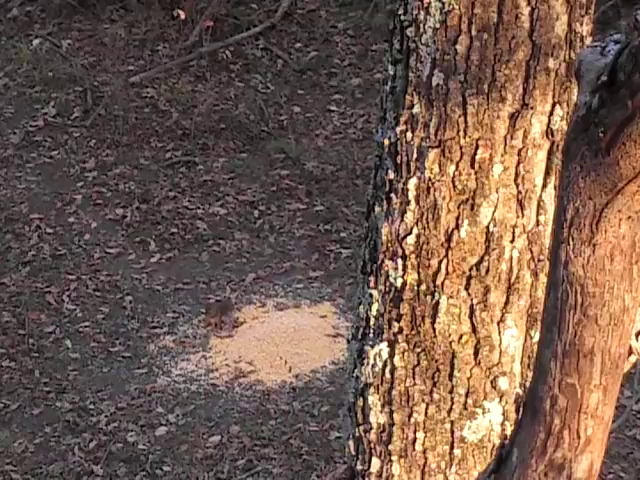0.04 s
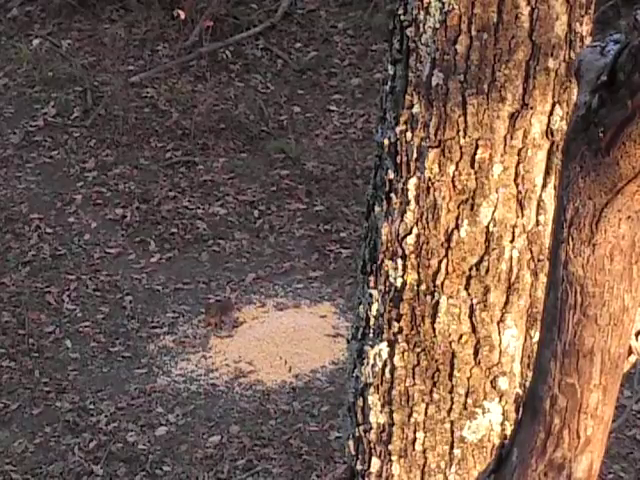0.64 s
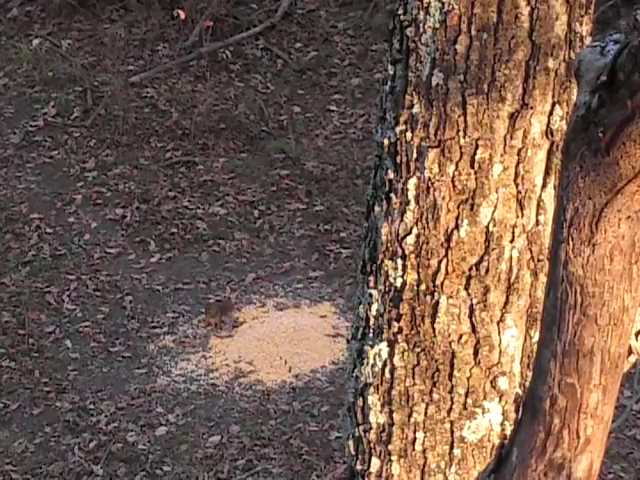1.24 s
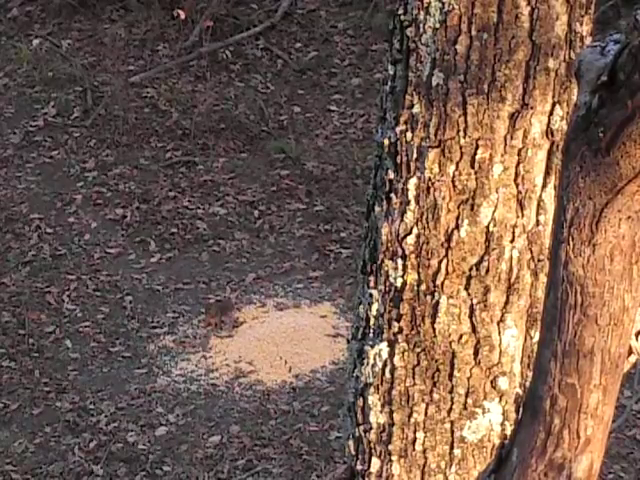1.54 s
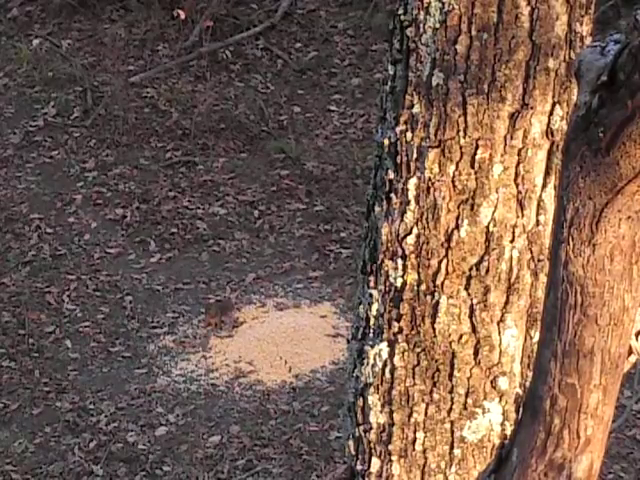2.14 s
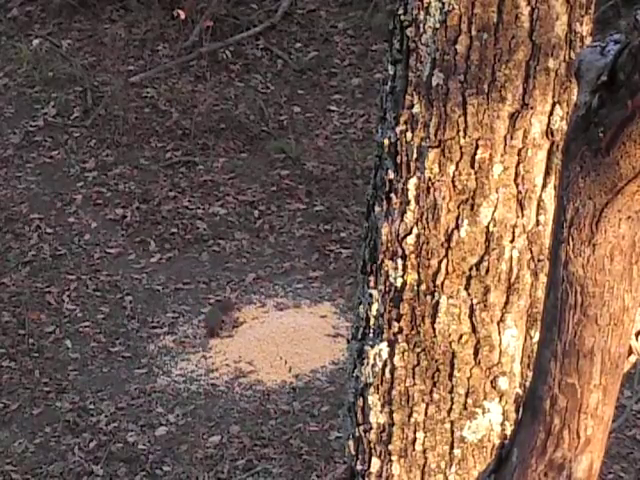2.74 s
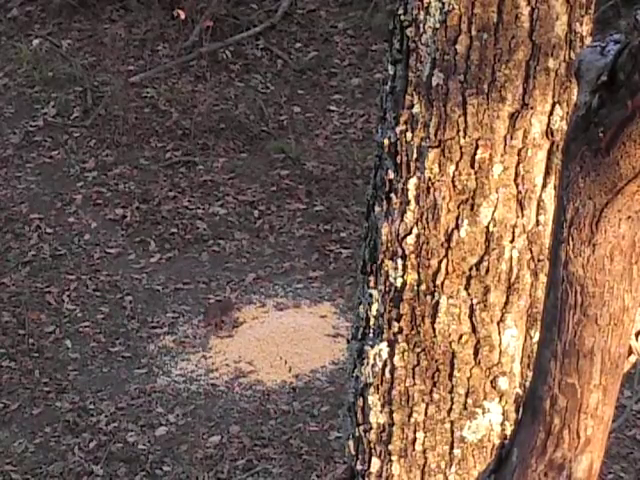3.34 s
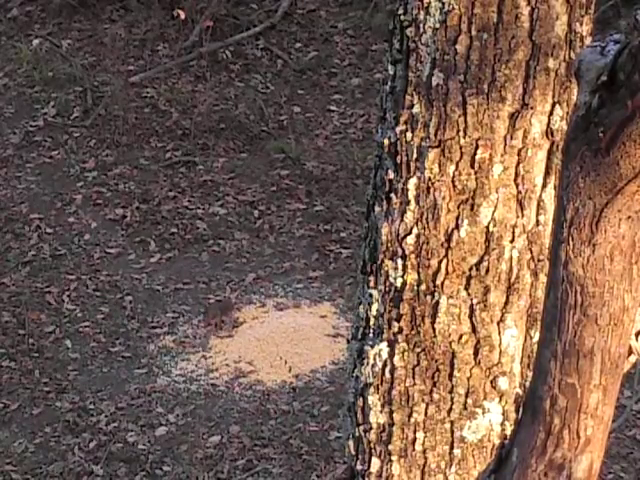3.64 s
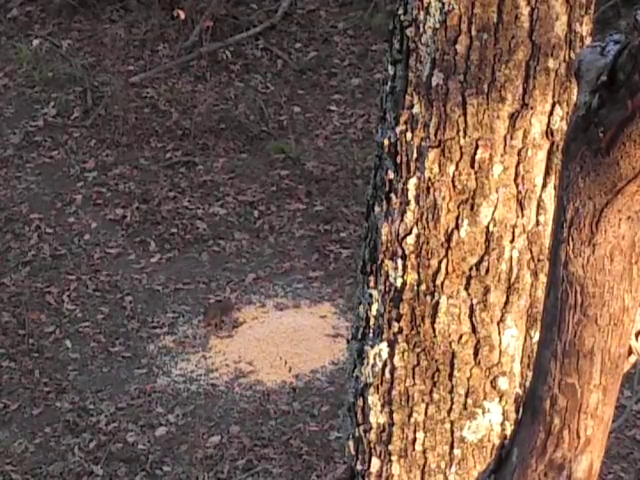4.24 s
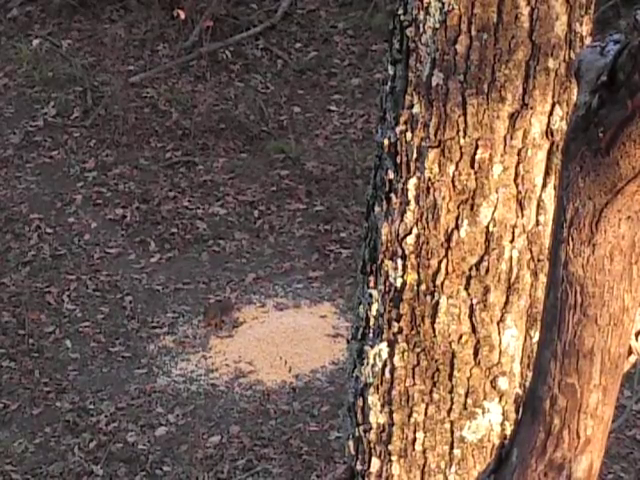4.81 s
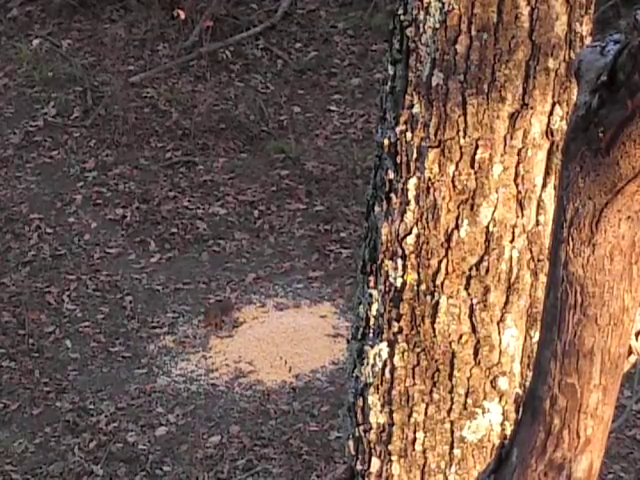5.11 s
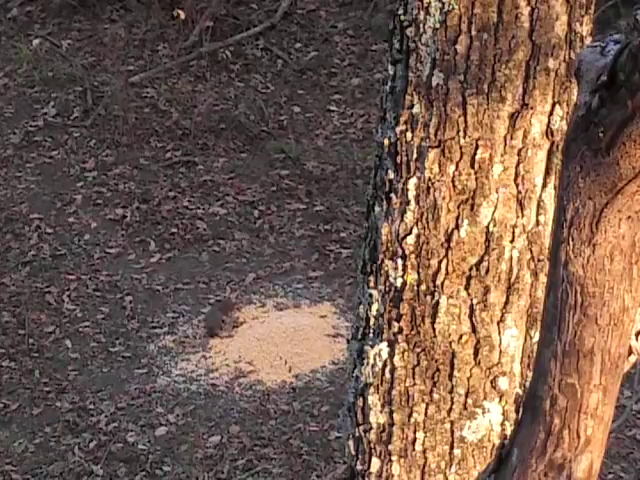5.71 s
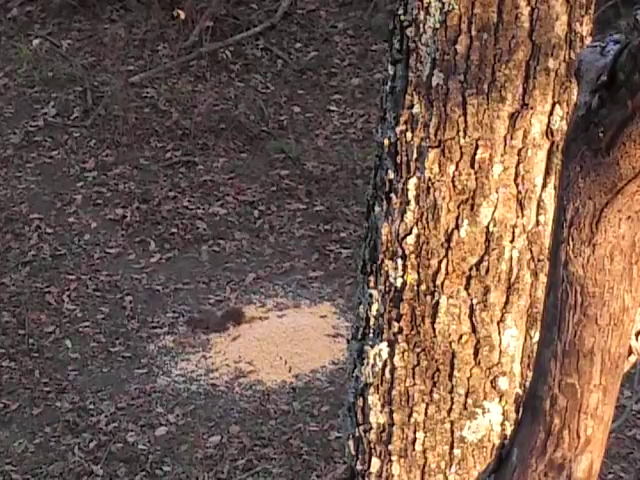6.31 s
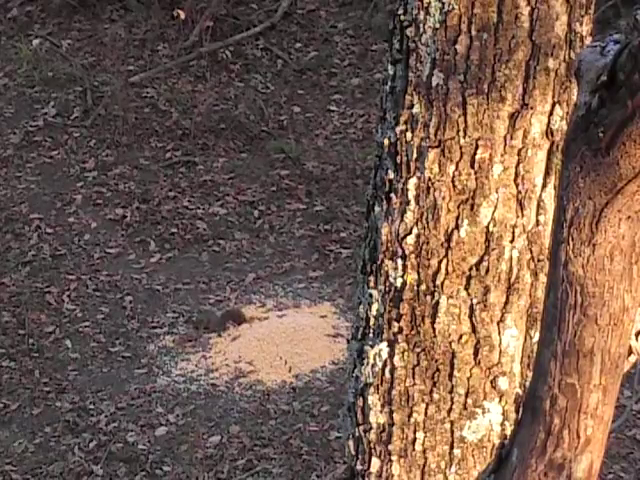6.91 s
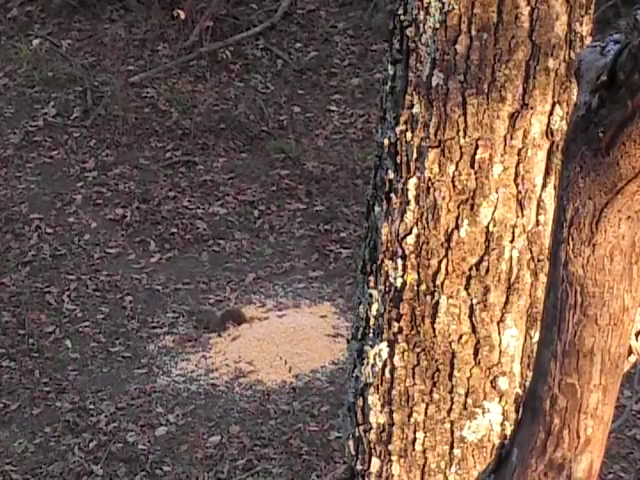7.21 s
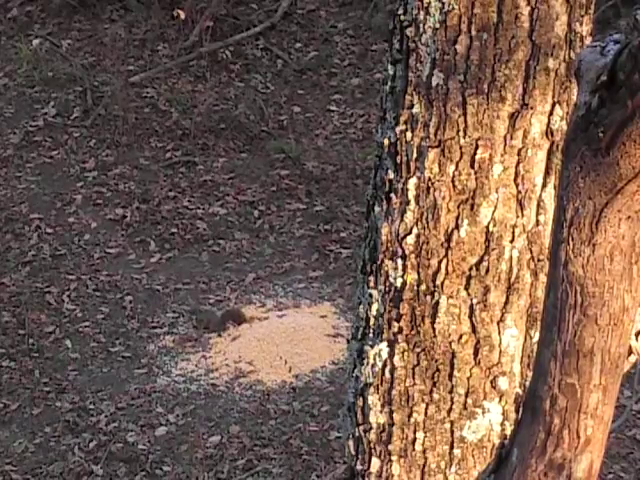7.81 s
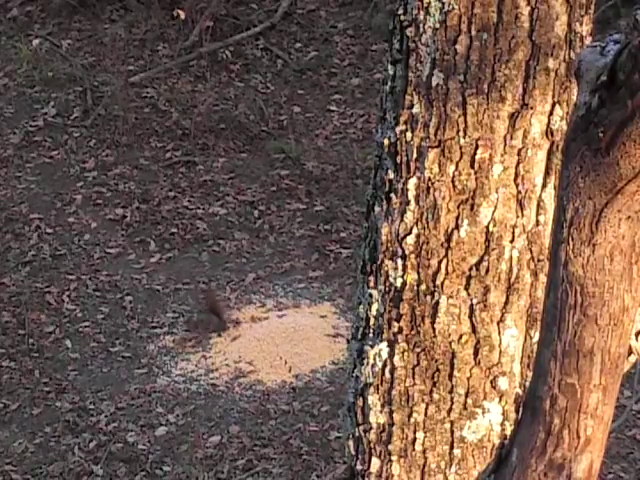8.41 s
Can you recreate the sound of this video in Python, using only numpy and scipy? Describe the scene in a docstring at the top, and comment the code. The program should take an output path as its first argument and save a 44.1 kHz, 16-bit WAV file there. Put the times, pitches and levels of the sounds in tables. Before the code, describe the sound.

Crickets trill in a wood as a bow fires with a sharp snap and twang, and the arrow cracks into the ground just after.

```python
"""Bow shot among crickets.

A bow is shot from a tree stand in a wood full of trilling crickets. The release clicks, the
string slams home and twangs, the fittings rattle; a quarter second later the arrow thuds into
the ground. The trees throw both sounds back, the nearest cricket falls silent, and gear and
dry leaves tick faintly."""
import sys
import numpy as np
from scipy import signal
from scipy.fft import rfft, irfft
from scipy.io import wavfile
from scipy.ndimage import uniform_filter1d

SR = 44100
rng = np.random.default_rng(int(sys.argv[2]) if len(sys.argv) > 2 else 0)


def output_pcm(signal):
    """Save a mono or channel-first signal as 16-bit PCM at the path in sys.argv[1].

    Samples are clipped to [-1, 1] before scaling.
    """
    pcm = np.clip(np.atleast_2d(signal).T, -1, 1) * 32767
    wavfile.write(sys.argv[1], SR, np.round(pcm).astype(np.int16))


N = 377055
TIME = np.arange(N) / SR
AGE = TIME[:SR // 2]  # time since an onset [s]


def amp(db):
    """Decibels to gain."""
    return 10 ** (np.asarray(db) / 20)


def unit(x):
    """Scales to rms 1."""
    return x / np.sqrt(np.mean(x ** 2) + 1e-20)


def read(points, hz):
    """Reads a table on a log-frequency axis."""
    f, value = np.transpose(points)
    return np.interp(np.log(hz + 1), np.log(f + 1), value)


def decay(t, t60_s):
    """Exponential decay, 60 dB down at t60_s."""
    return np.exp(-np.log(1000) * t / t60_s)


def add(mix, start_s, sound):
    """Adds a sound to the mix in place."""
    part = mix[:, round(start_s * SR):][:, :sound.shape[-1]]
    part += sound[..., :part.shape[1]]


def noise(shape_db, likeness, size):
    """Stereo noise with spectrum shape_db(hz) and a table of left-right likeness."""
    hz = np.fft.rfftfreq(size, 1 / SR)
    mid, side = rfft(rng.standard_normal((2, size)))
    same = np.clip(read(likeness, hz), -1, 1)
    pair = mid * np.sqrt(1 + same) + np.array([[1], [-1]]) * side * np.sqrt(1 - same)
    return unit(irfft(pair * amp(shape_db(hz)), size))


# near sounds at the two microphone ports: (frequency [Hz], likeness [0-1])
PORT_LIKENESS = [(100, 0.99), (1500, 0.98), (3000, 1), (6000, .75), (10000, 0.5), (14000, 0.21)]

def near_noise(spectrum, size):
    """Noise from close by: alike at both ports except in the treble."""
    return noise(lambda hz: read(spectrum, hz), PORT_LIKENESS, size)


def snaps(rows):
    """Noise bursts with one broad resonance each; the briefest rise most sharply."""
    out = np.zeros((2, N))
    for start_s, db, pitch_hz, octaves, t60_s in rows:
        def band_db(hz):
            offset = np.log2((hz + 1) / pitch_hz) / octaves
            return -10 * np.log10(1 + 3 * offset ** 4) - 10 * np.log10(1 + (hz / 13000) ** 20)
        burst = noise(band_db, PORT_LIKENESS, len(AGE))
        envelope = decay(AGE, t60_s) * (1 - np.exp(-AGE / (0.014 * t60_s)))
        add(out, start_s, amp(db) * unit(burst * envelope) * np.sqrt(np.mean(envelope ** 2)))
    return out


# still air: (frequency [Hz], relative density [dB])
AIR_SPECTRUM = [(20, -8.5), (60, -8), (100, -4.5), (130, 2.5), (220, -4.5), (400, -6.5), (900, -9.5),
                (1500, -15), (3500, -17), (7600, -19), (10100, -9), (12000, -19.5), (14000, -22),
                (15700, -28)]
# its left-right match: (frequency [Hz], likeness [0-1])
AIR_LIKENESS = [(30, 0.5), (140, 0.69), (500, 0.22), (1500, 0.17), (4000, 0.65), (9000, 0.24),
                (14000, 0.0926)]

def air():
    """Distant rumble under fine hiss, with one faint far-off whine."""
    waver = unit(uniform_filter1d(rng.standard_normal(N), size=SR // 8))
    whine = np.sin(2 * np.pi * np.cumsum(838 + 4 * waver) / SR)
    return amp(-56.5) * noise(lambda hz: read(AIR_SPECTRUM, hz), AIR_LIKENESS, N) + amp(-73) * whine


def beat(first_s, per_s):
    """Running count of wing strokes at a steady or changing pace."""
    count = np.cumsum(per_s * np.ones(N)) / SR
    return count - np.interp(first_s, TIME, count) + 1


def trill(strokes, pitch_hz, slide_hz, arch_hz, duty, overtone_db):
    """Each wing stroke scrapes out one tone pulse whose pitch follows wing speed."""
    number = np.round(strokes).astype(int)
    place = np.clip((strokes - number) * 2 / duty, -1, 1)  # -1 to 1 through the pulse
    detune, force = rng.standard_normal((number.max() + 1, 2))[number].T
    hz = pitch_hz * (1 + .003 * detune) + slide_hz * place - arch_hz * place ** 2
    phase = 2 * np.pi * np.cumsum(hz) / SR
    pulse = np.cos(np.pi / 2 * place) * amp(0.61 * force)
    return unit(pulse * (np.sin(phase) + amp(overtone_db) * np.sin(2 * phase)))


def undergrowth(song, wet_db, t60_s):
    """Leaves and trunks scatter a song; its level is kept."""
    scatter = noise(np.zeros_like, [(4000, 0.62), (7000, 0.81)], len(AGE)) * decay(AGE, t60_s)
    wet = signal.oaconvolve(song[None], scatter, axes=1)[:, :N]
    return np.std(song) * unit(unit(song) + amp(wet_db) * unit(wet))


# colour of the far crickets: (frequency [Hz], gain [dB])
CHORUS_EQ = [(3900, -25.5), (4300, -3.5), (4600, -2), (5050, 1.4), (5500, -0.9), (6100, -4.5), (6450, 2.5),
             (6750, -13.5)]

def chorus():
    """Far crickets blur together, each at its own pace and wandering pitch."""
    songs = np.zeros(N)
    for hz in np.linspace(4550, 6350, num=22):
        strokes = TIME * rng.uniform(30, 62) + rng.random()
        wander = np.interp(TIME, np.linspace(0, TIME[-1], num=40), rng.standard_normal(40))
        songs += trill(strokes, hz + 80 * wander, slide_hz=-260, arch_hz=110.8,
                       duty=.64, overtone_db=-10.5)
    scattered = undergrowth(songs, wet_db=-0.5, t60_s=.34)
    colour = amp(read(CHORUS_EQ, np.fft.rfftfreq(N, 1 / SR)))
    return amp(-47) * unit(irfft(rfft(scattered) * colour, N))


# the cricket with the sliding note flags once and recovers: (time [s], pace [strokes/s])
SLIDING_PACE = [(0, 57.7), (2.3, 58.1), (4.35, 57.7), (5.15, 53.8), (5.85, 58.75), (8.55, 57.4)]

def crickets(startled_s=6.12):
    """Four singers stand out from the chorus; the shot startles the nearest into silence."""
    hush = decay(np.maximum(TIME - startled_s, 0), t60_s=.04)
    pace = np.interp(TIME, *np.transpose(SLIDING_PACE))
    near = trill(beat(first_s=.025, per_s=18.883), pitch_hz=6580, slide_hz=-22, arch_hz=454,
                 duty=.46, overtone_db=-37)
    sliding = trill(beat(first_s=.0085, per_s=pace), pitch_hz=4622, slide_hz=-500, arch_hz=283,
                    duty=.83, overtone_db=-27)
    slow = trill(beat(first_s=.04, per_s=16.648), pitch_hz=6030, slide_hz=30, arch_hz=517,
                 duty=.38, overtone_db=-33)
    quick = trill(beat(first_s=.041, per_s=19.81), pitch_hz=6490, slide_hz=0, arch_hz=388,
                  duty=.5, overtone_db=-35.5)
    out = undergrowth(amp(-48) * near * hush, wet_db=-7.5, t60_s=.38)
    out += undergrowth(amp(-52) * sliding, wet_db=-30.5, t60_s=.18)
    out += undergrowth(amp(-56.5) * slow, wet_db=-5, t60_s=.15)
    out += undergrowth(amp(-61.2) * quick, wet_db=-12, t60_s=.15)
    return (out + chorus()) * amp([[-1.4], [1.2]])  # louder on the right


# soft movements: (centre [s], level [dB], half length [s])
RUSTLES = [(.15, -60.5, 0.47), (.72, -58, .11), (1.548, -61.5, 0.458), (6.8, -59.5, 0.61), (7.9, -76, 0.4)]
# their colour: (frequency [Hz], relative density [dB])
RUSTLE_SPECTRUM = [(100, -12), (400, -1.5), (750, -1), (1300, -6.5), (3000, -8.5), (8000, -12),
                   (14000, -33)]

def rustle():
    """Clothing and leaves move, swelling and fading."""
    motion = sum(amp(db) / (1 + ((TIME - s) / half_s) ** 4) for s, db, half_s in RUSTLES)
    return motion * near_noise(RUSTLE_SPECTRUM, N)


# patches of crackle: (start [s], length [s], level [dB])
LEAF_PATCHES = [(0.544, .3, -62), (6.241, .2, -55.5), (6.44, .08, -50), (6.551, .5, -64), (8.219, .08, -54),
                (8.358, 0.13, -60.5)]

def leaf_crackle(clicks_per_s=600):
    """Dry leaves give patches of tiny random snaps."""
    out = np.zeros((2, N))
    spectrum_hz_db = [(300, -10), (2000, -1.5), (7000, 2), (10500, 4), (15000, -18)]
    for start_s, length_s, db in LEAF_PATCHES:
        size = round(length_s * SR)
        chance, force = rng.random((2, size))
        swell = np.sin(np.pi * np.arange(size) / size)
        clicks = (chance < clicks_per_s / SR) * amp(13 * force) * swell
        leaf = near_noise(spectrum_hz_db, 512) * decay(AGE[:512], t60_s=.0073)
        add(out, start_s, amp(db) * unit(signal.fftconvolve(clicks[None], leaf, axes=1)))
    return out


# dull taps of gear on the stand: (time [s], level [dB], pitch [Hz])
GEAR_TAPS = [(.141, -42, 830), (.186, -44, 840), (1.343, -49, 480), (1.578, -46, 1040), (1.632, -46.5, 630),
             (2.75, -47.5, 250), (5.27, -48.5, 250)]
# gear, twigs and leaves: (time [s], level [dB], pitch [Hz], width [oct], t60 [s])
SHARP_TICKS = [(.671, -36.5, 2800, 1.8, .06), (.925, -43.5, 1750, 0.83, 0.077),
               (.99, -46.5, 2800, 1.3, 0.076), (1.395, -41, 1100, 1.2, .016), (6.469, -41, 4200, 2.1, .04),
               (6.4965, -34.5, 3460, .15, 0.019), (6.546, -39.5, 3300, .35, .015),
               (6.751, -37, 9600, .41, .015), (6.782, -45, 5050, 1.3, .03),
               (6.908, -36.5, 10000, .45, .016), (6.954, -38, 11000, .5, .0082),
               (7.241, -42.5, 4100, 1.2, 0.056), (7.599, -48, 3926, .98, .038)]

def taps_and_ticks(faint_per_s=5.5):
    """Small contacts close by, and fainter random ticks through the wood."""
    taps = [(s, db, hz, .25, .055) for s, db, hz in GEAR_TAPS]
    jitter, force = rng.random((60, 2)).T
    times_s = (np.arange(len(jitter)) + jitter) / faint_per_s
    levels_db = -59.5 + 2.5 * (2 * force - 1)
    faint = [(s, db, 2800, .75, .07) for s, db in zip(times_s, levels_db)]
    return snaps(taps + SHARP_TICKS + faint)


# colour of the tree echo: (frequency [Hz], gain [dB])
ECHO_EQ = [(80, -19.5), (220, -12), (380, 5), (560, -4), (850, 5.5), (1200, -3.5), (1800, -0.5), (4000, -4),
           (8000, 3), (12000, 4.5), (15000, 2)]
# its decay: (frequency [Hz], t60 [s])
ECHO_T60 = [(100, 0.79), (400, 1.18), (900, 0.92), (2500, 1.54), (6000, 0.89), (12000, 1.2)]

def tree_echo(sound, wet_db):
    """Many weak reflections from trunks and leaves merge into a tail."""
    t = TIME[:2 * SR]
    build_up = 1 - np.exp(-(t / 0.011) ** 2)
    reflections = noise(np.zeros_like, [(200, .9), (1000, 1), (5000, .3)], len(t)) * build_up
    hz, age, bands = signal.stft(reflections, SR, nperseg=512)
    bands = bands * amp(read(ECHO_EQ, hz))[:, None] * decay(age, read(ECHO_T60, hz)[:, None])
    tail = signal.istft(bands, SR, nperseg=512)[1] / np.sqrt(SR)
    return amp(wet_db) * signal.fftconvolve(sound, tail, axes=1)[:, :N]


# arrow through dry leaves: (time [s], level [dB], pitch [Hz], width [oct], t60 [s])
ARROW_CRACKS = [(6.0149, -15.5, 7750, 0.29, .008), (6.0168, -16, 3400, 2, 0.011),
                (6.0205, -26, 4500, 2, 0.015), (6.024, -34, 7800, 1.6, 0.16),
                (6.037, -31.5, 550, 1.1, 0.077)]
# struck soil: (frequency [Hz], relative level [dB], t60 [s])
GROUND_MODES = [(356, -10, 0.016), (554, 8.5, 0.0091), (775, -8.5, 0.017), (1123, -1.5, 0.016)]

def arrow():
    """The point cracks through leaves and stops in the soil with a dead, hollow thud."""
    out = snaps(ARROW_CRACKS)
    modes = sum(amp(db) * decay(AGE, t60) * np.sin(2 * np.pi * hz * AGE) for hz, db, t60 in GROUND_MODES)
    bass_cut = signal.butter(5, 228, "high", fs=SR)  # too little ground moves to radiate bass
    thud = signal.lfilter(*bass_cut, modes * (1 - np.exp(-AGE / 0.0012)))
    add(out, 6.0159, -amp(-4.5) * thud)
    return out


def launch():
    """The shaft hisses over its rest while the string sweeps the air."""
    hiss = (5.7565, -20.5, 5001, 2.0, 0.22)
    sweep = (5.751, -34.0, 601, 0.5, 0.05)
    return snaps([hiss, sweep])


def rebounds(start_s=5.7835, gap_s=.00605, first_db=-8, loss_db=3):
    """The limbs rebound evenly; each weaker knock comes from another part of the bow."""
    pitches_hz = 3010 * 2 ** (0.298 * rng.standard_normal(7))
    return snaps([(start_s + k * gap_s, first_db - k * loss_db, hz, 1.4, .017)
                  for k, hz in enumerate(pitches_hz)])


# riser, limbs and fittings: (frequency [Hz], relative level [dB], t60 [s])
FRAME_MODES = [(612, 1, .2), (770, -2, .14), (1469, -9, .2), (1558, -7, .19), (1760, -10, .2),
               (1835, -6, .18), (1905, -6, .18), (2057, -7, .16), (2139, -1, .17), (2290, -3, .18),
               (2402, -8, .18), (2695, -5, .13), (3015, 0, .16), (3303, -6, .16), (3555, -7, .16),
               (3914, -5, .16), (4326, 0, .14), (4441, -7, .2), (5377, -6, .2), (6283, -7, .2),
               (7581, -9, .2), (7811, -9, .2), (8110, -4, .18), (8371, -5, .13)]

def frame_ring(damping):
    """The jolted frame rings in its modes."""
    ring = sum(amp(db) * decay(AGE, t60) * np.sin(2 * np.pi * (hz * AGE + rng.random()))
               for hz, db, t60 in FRAME_MODES)
    return amp(-19.5) * ring * damping * (1 - np.exp(-AGE / 0.0019))


# loose fittings: (frequency [Hz], relative density [dB])
BUZZ_SPECTRUM = [(100, -34), (300, 3), (650, 1.5), (1000, -4), (1800, -3), (3500, -10.5), (5500, -6),
                 (7000, -10), (8200, -3.5), (10000, -10.5), (12500, -21), (14500, -48)]

def fittings_buzz(cycles):
    """The fittings rattle at both ends of each string swing, then shiver faintly."""
    slaps = 1 + .5 * np.cos(4 * np.pi * cycles)
    rattle = amp(-15.5) * near_noise(BUZZ_SPECTRUM, len(AGE)) * slaps * decay(AGE, t60_s=.25)
    shiver = amp(-38) * near_noise(BUZZ_SPECTRUM, len(AGE)) * decay(AGE, t60_s=.82)
    return rattle + shiver


# bowstring: (harmonic number, relative level [dB], t60 [s])
STRING_PARTIALS = [(1, -7, 0.49), (2, 1.5, 0.33), (3, 6, 0.16), (4, -1.5, 0.56), (5, -11, 0.25),
                   (6, -18, 0.19), (7, -10, 0.14)]

def string_twang(cycles, damping):
    """The string's harmonics glide together; the cable hums on a little longer."""
    twang = sum(amp(db) * decay(AGE, t60) * np.sin(2 * np.pi * (round(k) * cycles + rng.random()))
                for k, db, t60 in STRING_PARTIALS)
    cable = amp(-10) * np.sin(2 * np.pi * 303 * AGE) * decay(AGE, t60_s=.55) / (1 + (AGE / 0.18) ** 10)
    return amp(-21) * (twang * damping + cable) * (1 - np.exp(-AGE / 0.014))


# release clicks, then string and limb slam: (time [s], level [dB], pitch [Hz], width [oct], t60 [s])
BOW_KNOCKS = [(5.739, -37.5, 10460, .5, .017), (5.7496, -19.5, 5780, 1, .013),
              (5.7547, -8.5, 4800, 0.93, .011), (5.7653, -7, 9000, 1.2, .009), (5.7656, -9, 2300, 1.2, .03),
              (5.7715, -4, 4400, 0.33, .018), (5.7738, -6, 1300, 1.55, 0.017)]
# the slack string tightens as the limbs settle: (time [s], pitch [Hz])
STRING_GLIDE = [(5.772, 83), (5.8, 86.7), (5.83, 96.2), (5.87, 101), (5.95, 97)]

def bow():
    """The released string slams home and sets frame, string and fittings vibrating."""
    out = snaps(BOW_KNOCKS) + launch() + rebounds()
    damping = 1 / (1 + (AGE / 0.095) ** 8)  # friction in the rubber stops the last small swings
    add(out, 5.7655, frame_ring(damping))
    twang_s = STRING_GLIDE[0][0]
    cycles = np.cumsum(np.interp(twang_s + AGE, *np.transpose(STRING_GLIDE))) / SR
    add(out, twang_s, string_twang(cycles, damping) + fittings_buzz(cycles))
    lag = np.exp(-2j * np.pi * np.fft.rfftfreq(N) * 0.77)  # bow on the left: right lags 0.77 sample
    return np.array([out[0], irfft(rfft(out[1]) * lag, N)])


def scene():
    """The close bow is nearly dry; the arrow wakes more echo, and far trees answer it dully."""
    shot, hit = bow(), arrow()
    radiated = signal.lfilter(*signal.butter(1, 600, "high", fs=SR), shot)  # its bass does not carry
    echo = tree_echo(radiated, wet_db=-11) + tree_echo(hit, wet_db=-3)
    out = shot + hit + echo + taps_and_ticks() + rustle() + leaf_crackle() + crickets() + air()
    far_echo = signal.lfilter(*signal.butter(2, 1100, fs=SR), tree_echo(hit, wet_db=-15))
    add(out, .33, far_echo)
    return out


def record(dry):
    """Microphone bass roll-off, clipping at full scale, then the band limit."""
    heard = signal.lfilter(*signal.butter(2, 38, "high", fs=SR), dry)
    band_limit = signal.firwin(511, 15750, window=("kaiser", 9), fs=SR)
    return signal.oaconvolve(np.clip(heard, -1, 1), band_limit[None], "same")


dry = scene()
out = record(dry)
output_pcm(out)
```